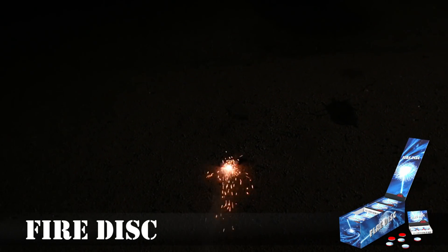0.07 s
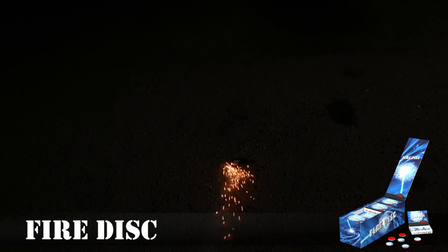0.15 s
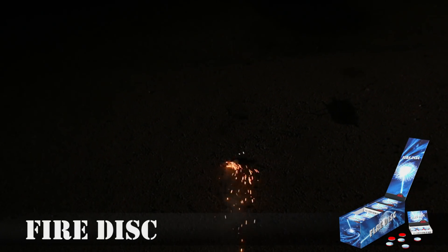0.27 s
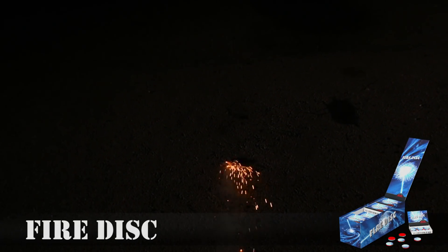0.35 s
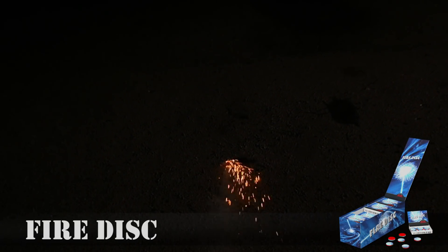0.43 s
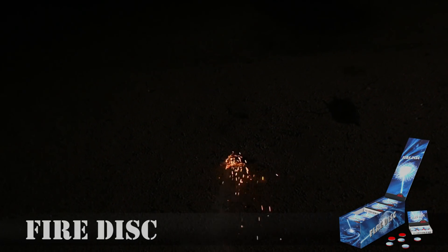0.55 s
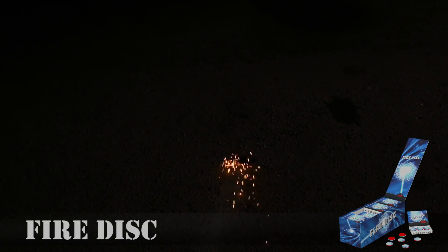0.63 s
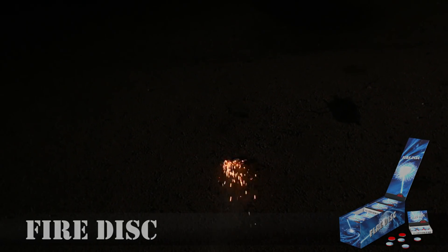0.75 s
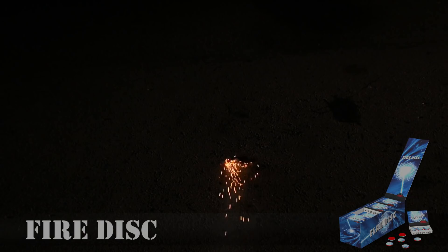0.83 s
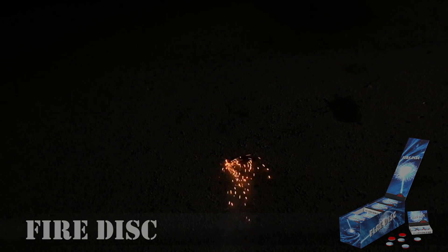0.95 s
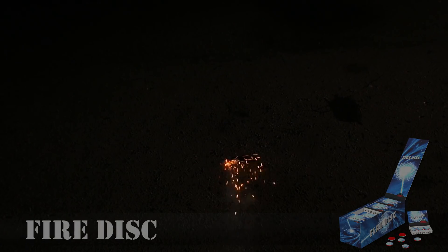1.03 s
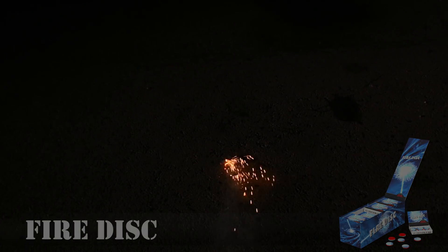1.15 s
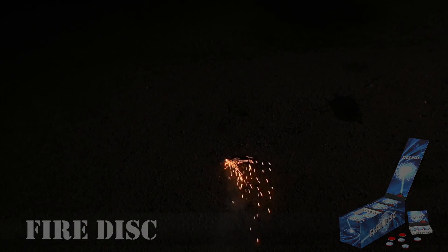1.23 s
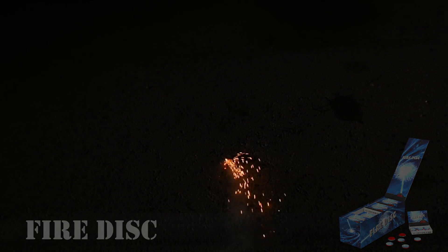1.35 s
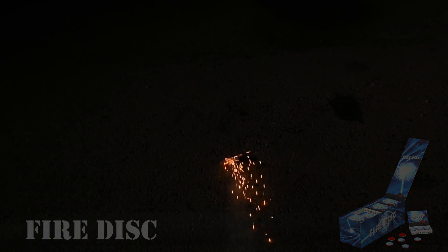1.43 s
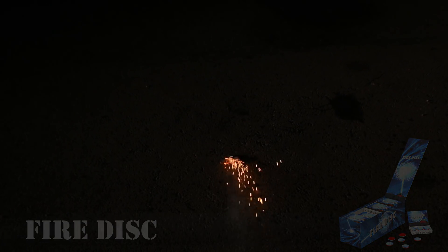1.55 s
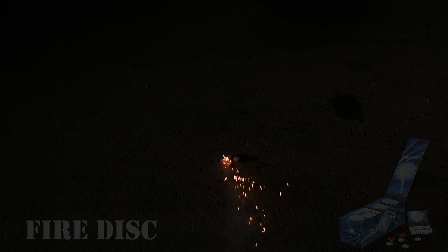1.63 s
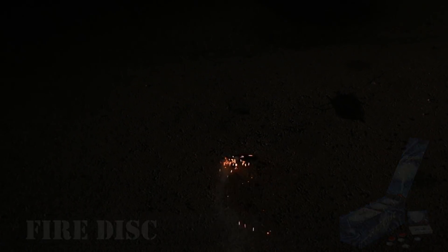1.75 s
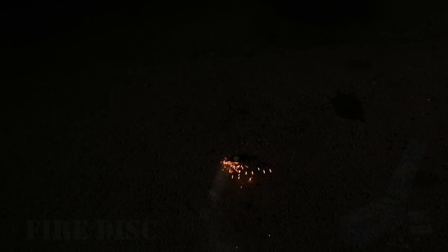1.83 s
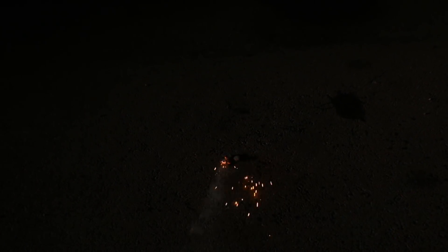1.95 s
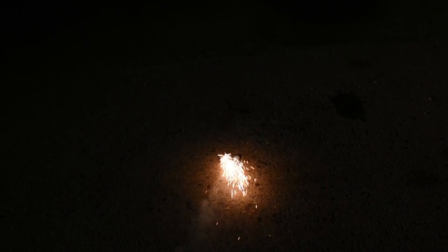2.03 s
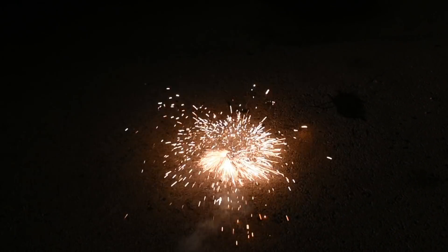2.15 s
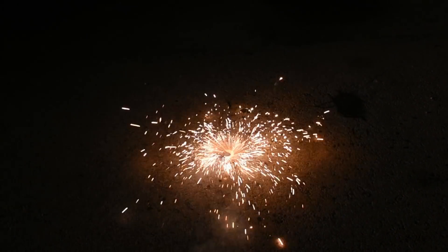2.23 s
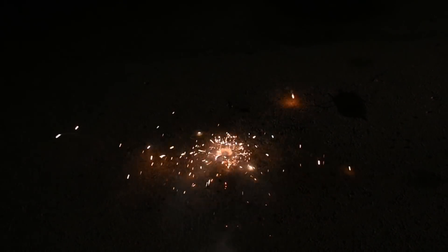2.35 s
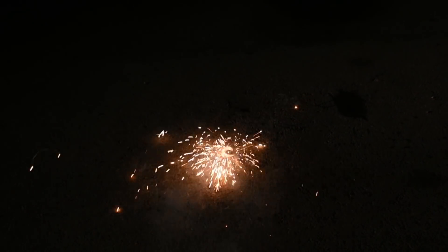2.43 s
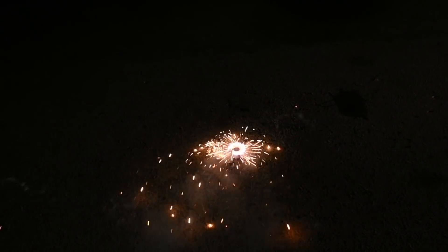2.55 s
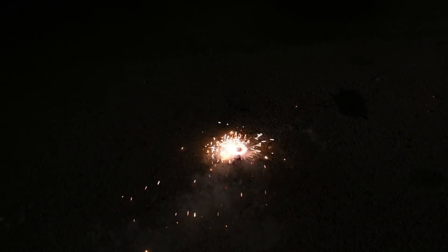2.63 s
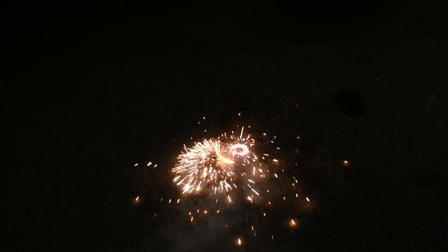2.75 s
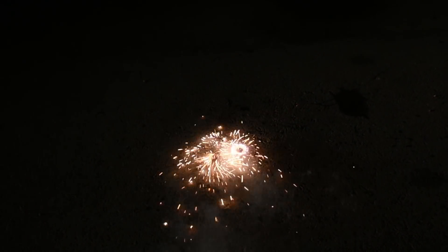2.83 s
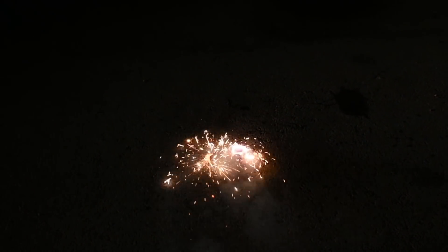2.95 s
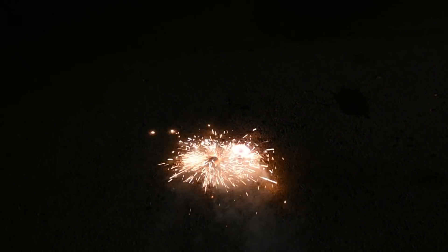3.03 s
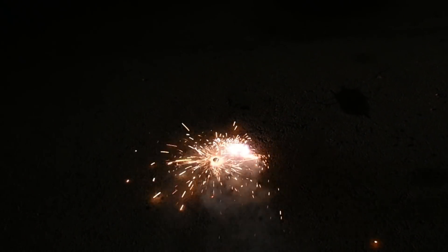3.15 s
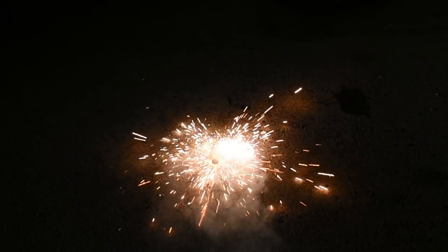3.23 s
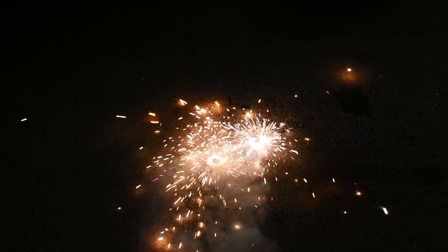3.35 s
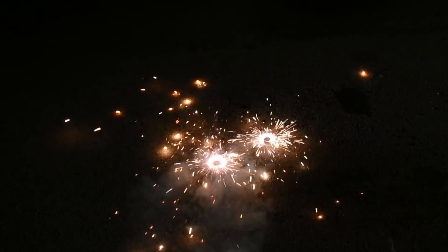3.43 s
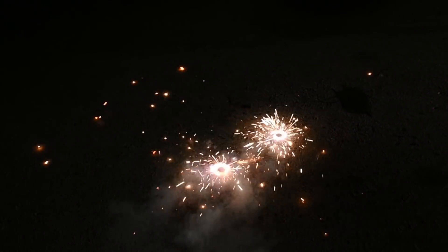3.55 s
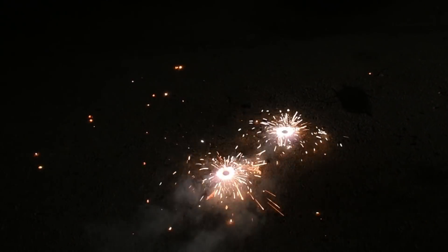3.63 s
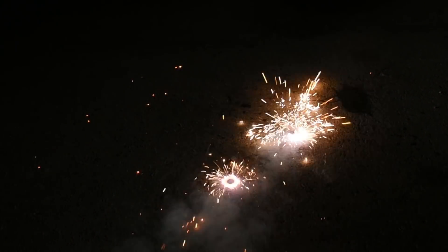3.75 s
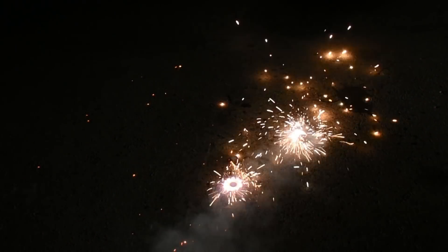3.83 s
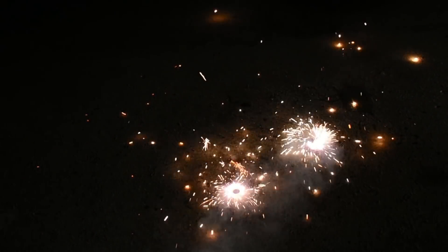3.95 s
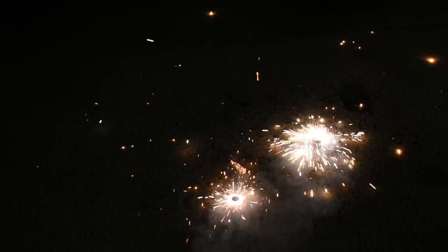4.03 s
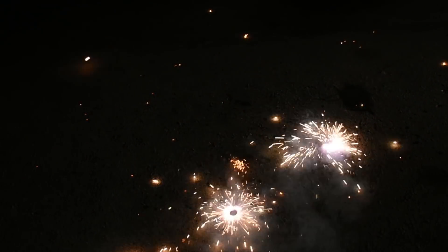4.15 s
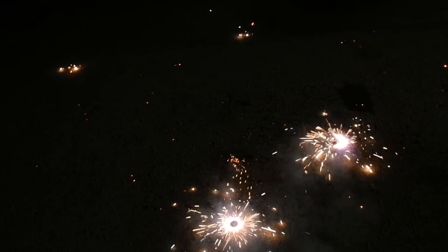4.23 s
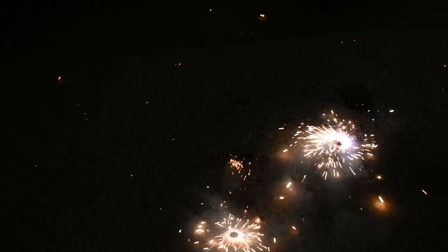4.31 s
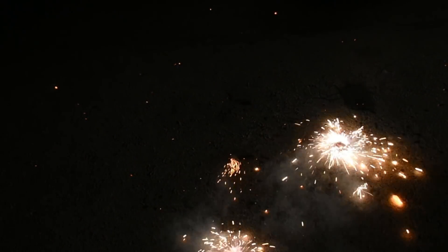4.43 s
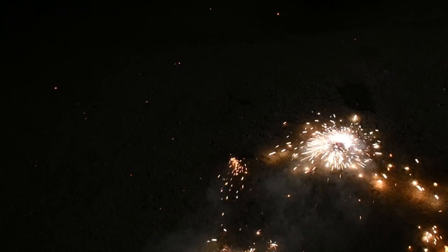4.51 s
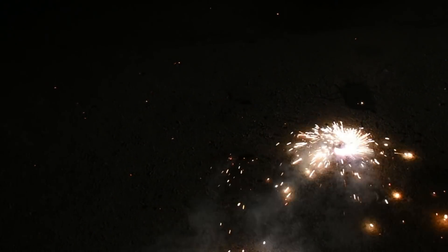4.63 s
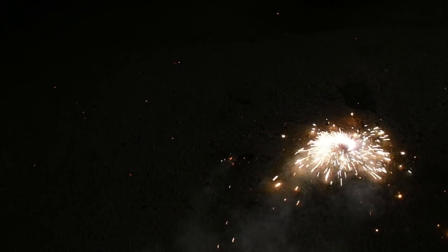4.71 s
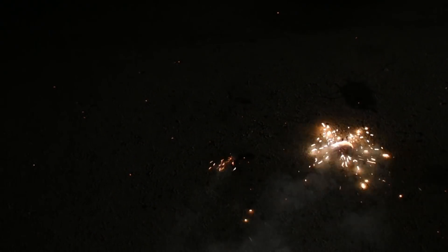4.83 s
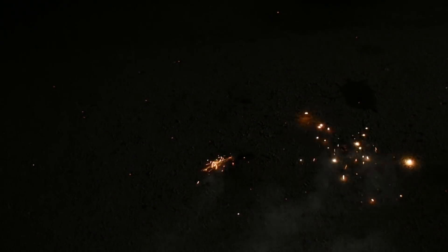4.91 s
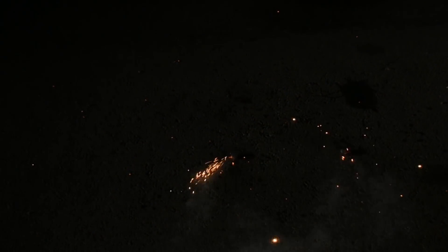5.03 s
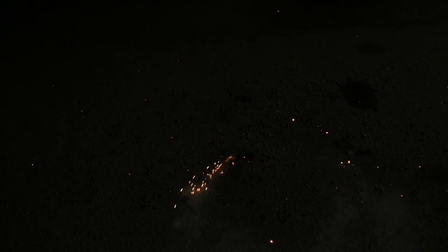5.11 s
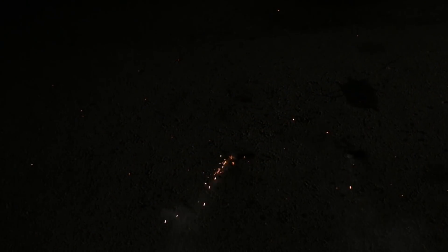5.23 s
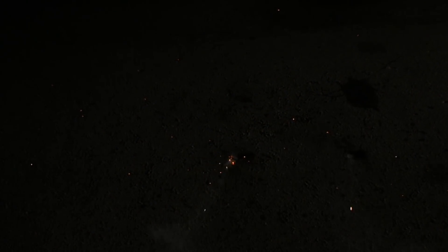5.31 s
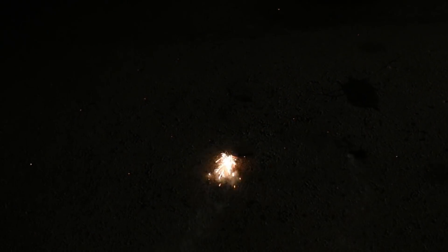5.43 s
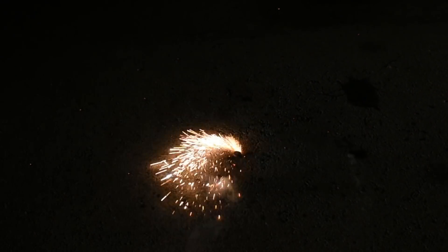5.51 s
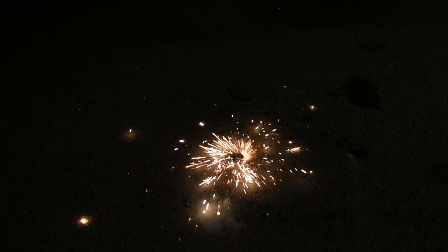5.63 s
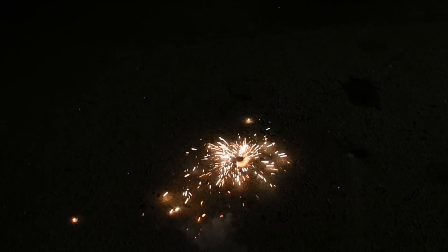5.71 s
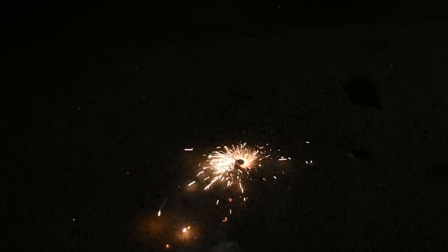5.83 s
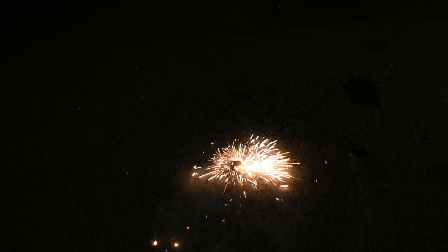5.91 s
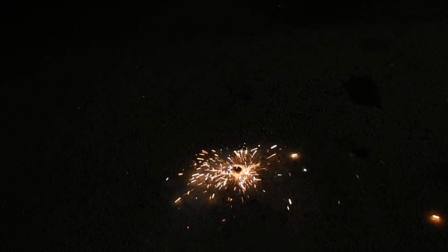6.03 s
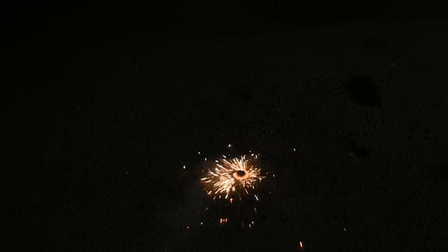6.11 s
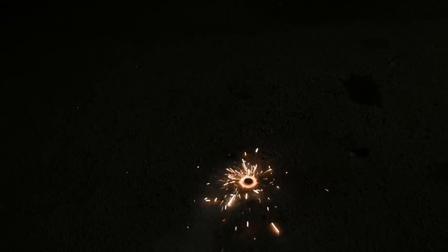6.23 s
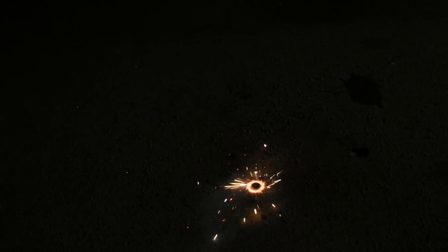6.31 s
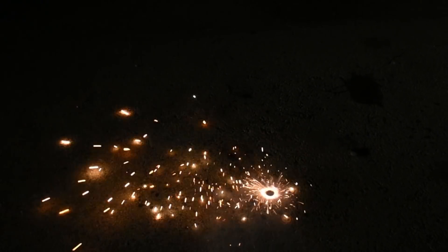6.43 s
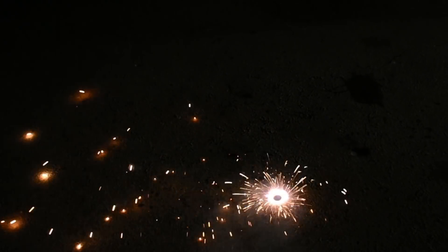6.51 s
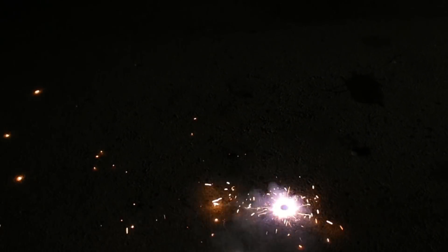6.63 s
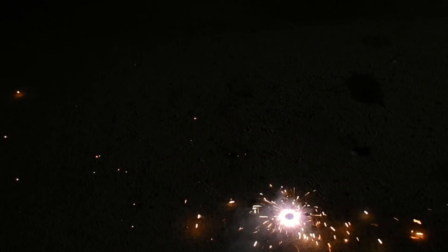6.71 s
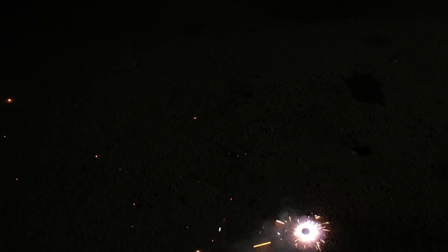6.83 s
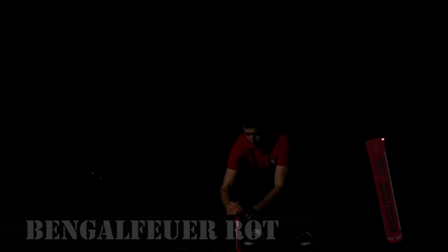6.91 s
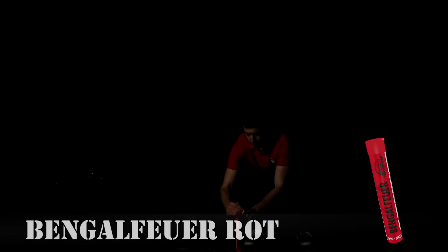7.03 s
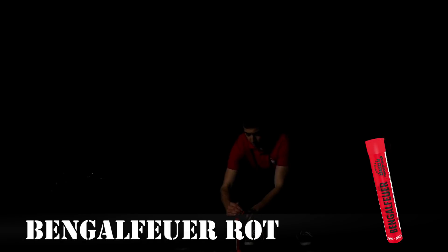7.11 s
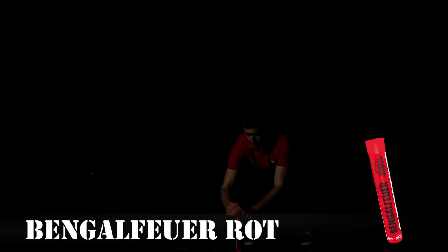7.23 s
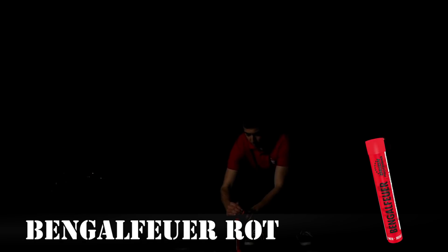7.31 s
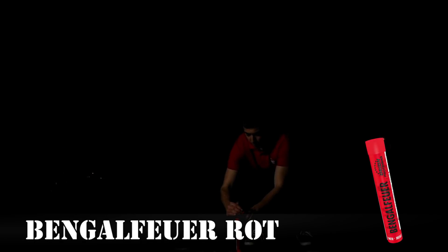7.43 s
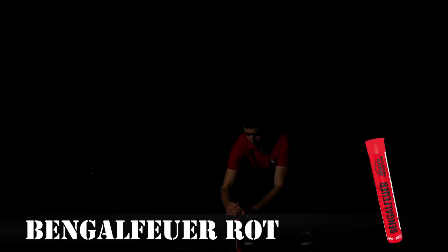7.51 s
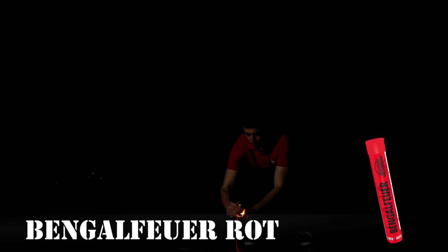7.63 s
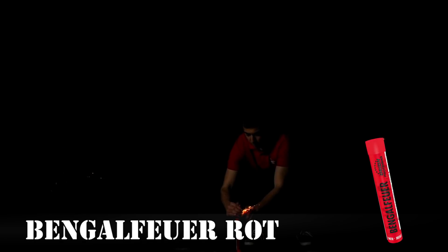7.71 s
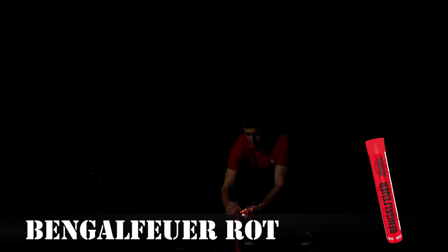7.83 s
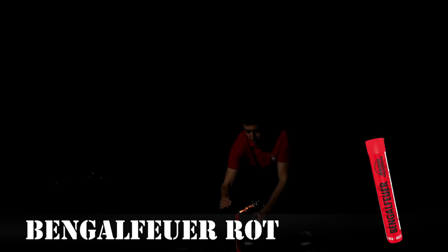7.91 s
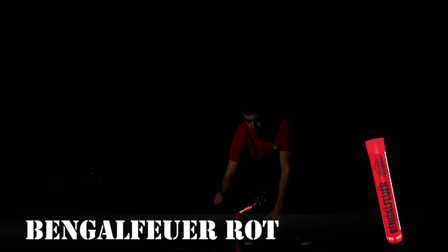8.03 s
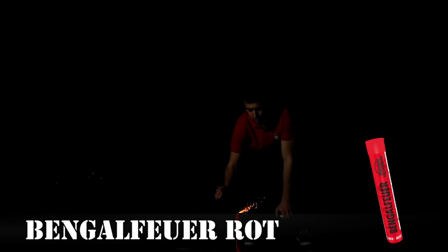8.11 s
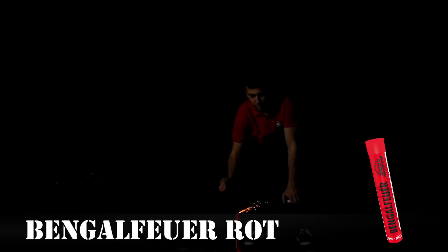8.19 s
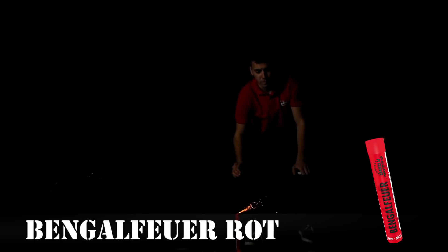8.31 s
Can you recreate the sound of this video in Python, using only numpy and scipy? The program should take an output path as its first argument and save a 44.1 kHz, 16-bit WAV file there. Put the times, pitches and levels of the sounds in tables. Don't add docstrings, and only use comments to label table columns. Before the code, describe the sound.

A faint fuse fizz snaps into a loud, fluttering firework roar with crackling sparks and ground knocks, then cuts to quiet, a lighter click and new fizz.

```python
import sys
import numpy as np
from scipy import signal
from scipy.fft import rfft, irfft, next_fast_len
from scipy.io import wavfile
from scipy.ndimage import uniform_filter1d

SR = 44100
rng = np.random.default_rng(int(sys.argv[2]) if len(sys.argv) > 2 else 0)


def invert_db(x):
    u = np.asarray(x, float) / 20
    return 10 ** u


def wrap_up_sound(samples):
    columns = np.atleast_2d(samples).T
    tamed = np.clip(columns, -1, 1)
    steps = np.round(tamed * 32767).astype(np.int16)
    wavfile.write(sys.argv[1], SR, steps)


N = 368543
T = np.arange(N) / SR
CUT_S = 6.938

# centre in Hz, curve number.
NIGHT_HZ = [(900, 0), (2500, 1), (5000, 1), (10000, 2)]


def unit(x):
    return x / np.sqrt(np.mean(x ** 2))


def curves(table):
    s, *columns = np.transpose(table)
    return [np.interp(T, s, c) for c in columns]


def on_log(hz, points):
    point_hz, value = np.transpose(points)
    return np.interp(np.log(hz), np.log(point_hz), value)


def walk(rate_hz, count=N):
    hold = int(SR / rate_hz)
    steps = np.repeat(rng.standard_normal(count // hold + 1), hold)
    return unit(uniform_filter1d(uniform_filter1d(steps, hold), hold)[:count])


def band(x, lo_hz, hi_hz):
    return signal.sosfilt(signal.butter(2, [lo_hz, min(hi_hz, .45 * SR)], "band", fs=SR, output="sos"), x)


def bell(s, half_s):
    out = np.zeros(N)
    near = slice(max(int((s - 4 * half_s) * SR), 0), int((s + 4 * half_s) * SR))
    out[near] = np.exp(-((T[near] - s) / half_s) ** 2)
    return out


def swells(floor_db, table):
    return 10 * np.log10(invert_db(2 * floor_db) + sum(invert_db(2 * db) * bell(s, half_s) for s, half_s, db in table))


def add_cycle(track, s, db, hz, turn):
    near = slice(int((s - 1.5 / hz) * SR), int((s + 1.5 / hz) * SR))
    t = (T[near] - s) * hz
    track[near] += invert_db(db) * np.exp(-(t / 0.38) ** 2) * np.cos(2 * np.pi * t + turn)


def bursts(table, low, high):
    out, t = np.zeros(N), np.arange(2000) / SR
    for s, db, ms, hz in table:
        envelope = np.sqrt(t / ms) * np.exp(-t / ms * 2700.0)
        grain = band(rng.standard_normal(2000) * envelope, hz / low, hz * high)
        i = int(s * SR)
        out[i:i + 2000] += invert_db(db) * grain / np.abs(grain).max()
    return out


def pops(table, trim_db):
    s, db = np.transpose(table)
    out = np.zeros(N)
    out[np.round(s * SR).astype(int)] = invert_db(db + trim_db)
    return band(out, 1500, 18000)


def sparks(rate_hz, size_db):
    size = invert_db(3.0 * np.minimum(rng.exponential(size=N), 2.5))
    cracks = (rng.random(N) < rate_hz / SR) * size
    return unit(rng.standard_normal(N) + invert_db(size_db) * cracks)


def colour_shifts(table, times, hz):
    s, half_s, centre_hz, db = np.transpose(table)
    half_width_octaves = 0.38
    coarse = times[::128]
    reach = db * np.exp(-(np.log2(hz / centre_hz) / half_width_octaves) ** 2)
    return np.interp(times, coarse, reach @ np.exp(-((coarse - s[:, None]) / half_s[:, None]) ** 2))


def gas(span_s, drive, colour, anchors, levels_db, main_hz, flicker_db, sweep_db=0 * T, spread_db=0 * T, shifts=None):
    # frequency in Hz, side minus mid in dB.
    port_diff = [(60, -14.5), (130, -25), (300, -21.5), (1000, -23.5), (3000, -21), (6000, -15),
                 (8500, -18.5), (12000, -12.5), (14500, -11.5), (16000, -19)]
    live = slice(int(span_s[0] * SR), int(span_s[1] * SR))
    count = len(T[live])
    size = next_fast_len(count)
    hz = np.maximum(np.arange(size // 2 + 1) * SR / size, 1)
    tint = invert_db(on_log(hz, colour))
    main = (hz > main_hz[0]) & (hz < main_hz[1])
    tint = tint / np.sqrt(2 * np.sum(tint[main] ** 2) / size)
    mid = rfft(drive[live], size) * tint
    side = rfft(rng.standard_normal(count), size) * tint * invert_db(on_log(hz, port_diff))

    main_db, *rest = [c[live] for c in levels_db]
    main_power = np.mean(invert_db(2 * main_db))
    rel = [0 * main_db]
    for c in rest:
        rel.append(c - 10 * np.log10(np.mean(invert_db(2 * (main_db + c))) / main_power))
    rel = np.array(rel)

    anchor_hz, column = np.transpose(anchors)
    out = np.zeros((2, N))
    for centre_hz in 63 * 2 ** np.arange(0, 8.1, .5):
        share = np.clip(1 - 2 * np.abs(np.log2(hz / centre_hz)), 0, 1)
        weights = [np.interp(np.log(centre_hz), np.log(anchor_hz), column == k) for k in range(len(rel))]
        beam = np.clip(np.log2(centre_hz / 900) / 4.3, .28, 1)
        db = main_db + np.dot(weights, rel) + beam * sweep_db[live] + flicker_db * walk(14, count=count)
        if shifts and centre_hz > 300:
            db = db + colour_shifts(shifts, T[live], centre_hz)
        m = irfft(mid * share, size)[:count]
        s = irfft(side * share, size)[:count] * invert_db(spread_db[live])
        out[:, live] += invert_db(db) * np.array([m + s, m - s])
    return out


def quiet_spot():
    # frequency in Hz, density in dB per Hz.
    calm_colour = [(41, -33), (70, -25), (129, -3), (152, -8), (336, -13), (695, -13.5), (1050, -12.5),
                   (1760, -22), (7910, -32), (14900, -39), (16000, -46)]
    level_db = [-58 + 0.5 * (T - CUT_S)]
    return gas((6.85, 9), rng.standard_normal(N), calm_colour, NIGHT_HZ[:1], level_db, (300, 1500), 0.55,
               spread_db=0 * T + 15.5)


def wind():
    # centre in seconds, half length in seconds, level in dB.
    gusts = [(.3, 0.056, -46), (0.507, 0.046, -40), (.74, 0.071, -43), (1.05, 0.22, -47), (1.283, .03, -40),
             (1.473, 0.068, -45), (2.4, 0.049, -44), (3.0, .4, -53.5), (3.98, .05, -60), (4.59, 0.05, -68),
             (5.05, .12, -53), (5.596, 0.04, -40), (5.765, 0.033, -39.5), (6.15, 0.48, -47),
             (6.437, 0.037, -32), (6.87, 0.037, -44), (7.633, 0.084, -46)]
    # time in seconds, peak in dB, frequency in Hz.
    puffs = [(0.288, -31, 59.2), (0.329, -26, 87.5), (0.506, -37, 76), (0.527, -35, 45.8),
             (0.739, -35, 37.7), (0.789, -22, 89), (0.833, -31, 91.5), (0.874, -34, 83.4),
             (0.949, -35, 37.7), (1.279, -29, 37.7), (1.409, -36, 51.1), (1.488, -36, 64.6),
             (3.306, -18, 89.6), (6.42, -29, 56.5), (7.53, -46.5, 110), (7.595, -43, 75), (7.68, -47, 95),
             (7.74, -48, 120)]
    breeze_db, shelter_db, port_diff_db = -54.5, -5, -7.5
    rumble = np.array([unit(band(rng.standard_normal(N), 27, top_hz)) for top_hz in (60, 90)])
    level_db = swells(breeze_db + shelter_db * (T > CUT_S), gusts) + 3.6 * walk(19)
    mid, side = rumble * invert_db(level_db)
    for s, db, hz in puffs:
        add_cycle(mid, s + 0.033 / hz, db, hz, .6)
        add_cycle(side, s, db - 4.0, hz * 1.5, -.6)
    return mid + invert_db(port_diff_db) * side * np.array([[1], [-1]])


def lighter():
    # frequency in Hz, level in dB, t60 in seconds.
    modes = [(6400, 2.5, 0.0072), (5840, -1, 0.0096), (9300, 2.5, 0.0056), (10900, -12, .008),
             (15000, -1, 0.009), (3200, -4.5, 0.012)]
    start_s, click_db, echo_db, echo_t60_s = 6.8836, -21, -39.0, 0.28
    t, out = T[:SR // 2], np.zeros((2, N))
    click, tail = 0, np.zeros((2, len(t)))
    for hz, db, t60_s in modes:
        click = click + invert_db(db - 60 * t / t60_s) * np.sin(2 * np.pi * hz * t)
        for port in tail:
            noise = band(rng.standard_normal(len(t)), hz * 0.86, hz * 1.14)
            port += invert_db(db - .5 * hz / 1e3) * unit(band(noise, hz * 0.82, hz * 1.12))
    tail = tail + 0.53 * np.sum(tail, axis=0)
    echo = invert_db(echo_db - 60 * t / echo_t60_s) * tail
    out[:, int(start_s * SR):][:, :len(t)] = invert_db(click_db) * click + echo
    return out


def second_fuse():
    # time in seconds, burn in dB, brightness in dB.
    burn = [
        (7.72, -71, -9),
        (7.746, -67, -10),
        (7.756, -52.5, -8),
        (7.85, -48, -10),
        (7.94, -52.5, -5.5),
        (7.98, -50, -2),
        (8.03, -53, 1.5),
        (8.135, -49, 3),
        (8.34, -52, 0),
    ]
    # frequency in Hz, density in dB per Hz.
    fizz_colour = [(290, -7.5), (500, -4.5), (686, -6.5), (737, -3), (901, -3.5), (1060, -8), (1390, -4.5),
                   (1490, -9.5), (1620, -7), (1990, -9), (2160, -12.5), (4020, -9), (7890, -18),
                   (10100, -16), (15500, -20)]
    # centre in Hz, number of the level curve that rules there.
    fizz_anchors = [(900, 0), (1600, 1), (2400, 1), (3300, 2), (4300, 2), (5800, 3), (8500, 3)]
    # time in seconds, half length in seconds, centre in Hz, gain in dB.
    late_flares = [
        (7.8, .04, 3000, -1),
        (7.85, .08, 6000, 2),
        (7.9, .06, 1700, 2),
        (8.1, .08, 7000, 4),
        (8.15, .08, 3500, 1),
        (8.28, .05, 10000, 0),
    ]
    burn_db, bright_db = curves(burn)
    lick_db = 4.6 * bell(7.9, 0.055)
    levels_db = [burn_db, lick_db, bright_db, 0.52 * bright_db]
    return gas((7.72, 9), sparks(100, 3.7), fizz_colour, fizz_anchors, levels_db, (400, 1400), 1.0,
               spread_db=0 * T + 8.0, shifts=late_flares)


def first_fuse():
    # frequency in Hz, density in dB per Hz.
    night_colour = [(41, -37), (70, -0.5), (182, -4.5), (250, -16.5), (286, -7.5), (472, -14.5),
                    (1070, -13), (1250, -13.5), (2600, -19), (5370, -28.5), (13600, -33.5), (16000, -38)]
    # time in seconds, half length in seconds, centre in Hz, gain in dB.
    early_flares = [
        (.62, .05, 8000, -2.5),
        (.95, .12, 9000, 3),
        (1.1, 0.3, 2800, 2),
        (1.28, .05, 3500, -2),
        (1.6, .08, 8500, 1.5),
        (1.65, .04, 2500, 4),
        (1.74, .018, 12000, 6),
        (1.83, .06, 12000, -5),
        (1.9, .04, 3000, 2.5),
    ]
    # time in seconds, peak in dB.
    grain_pops = [(0.2132, -38.2), (0.2901, -39.8), (0.3063, -41.3), (0.3544, -41.0), (0.3687, -36),
                  (0.4042, -40.1), (0.4526, -35.7), (0.4693, -27.8), (0.5108, -38.9), (0.5664, -41.0),
                  (0.628, -38.1), (0.6513, -42.0), (0.7791, -40), (0.8057, -39.9), (0.8406, -38),
                  (0.8489, -39.0), (0.8865, -40.5), (0.9063, -39.2), (0.9818, -38.4), (0.9964, -38.3),
                  (1.01, -41.3), (1.0926, -40.3), (1.1163, -32), (1.1423, -40.9), (1.2516, -41.2),
                  (1.3632, -40), (1.4838, -38), (1.5578, -41.7), (1.5767, -37), (1.5871, -40.0),
                  (1.608, -42.2), (1.6452, -41.0), (1.66, -42), (1.6654, -33), (1.6883, -34.6),
                  (1.7017, -43), (1.7376, -33.4), (1.7411, -34.2), (1.7464, -25), (1.7639, -41.1),
                  (1.8018, -43.5), (1.8058, -44.2), (1.8362, -44.6), (1.8576, -38.3), (1.8632, -42.9),
                  (1.891, -34), (1.9375, -40.9), (2.032, -37.9), (2.0398, -40.7), (2.0676, -43.8)]
    night_db = -48.5 - 0.8 * T
    fizz_db = -2 * T + 2.2 * bell(1, .6) + 4.2 * bell(0.49, .05)
    top_db = 2 * np.minimum(T, 1.6) + 2.8 * bell(.48, 0.041)
    fizz = gas((0, 2.3), sparks(150, 9), night_colour, NIGHT_HZ, [night_db, fizz_db, top_db], (300, 1500), 1.0,
               spread_db=0 * T + 9.0, shifts=early_flares)
    return fizz + pops(grain_pops, 4)


def stone_knocks():
    # time in seconds, peak in dB, length in ms, centre in Hz.
    knock_list = [(.2125, -32, 1.1, 4500), (.3684, -30, 0.87, 1300), (.3686, -35, .7, 3800),
                  (.4065, -28, 2.4, 900), (.409, -27.5, 3.7, 448), (.452, -35, 3, 3500),
                  (.4685, -34, 2.2, 8000), (.511, -35, 1.1, 2000), (1.737, -43, 4.8, 8000),
                  (1.744, -39, 6, 3500), (1.735, -39, 9, 14000), (1.515, -32.5, 2.2, 2500),
                  (1.978, -37, 4.3, 2200), (2.09, -41, 2.4, 2500), (2.302, -11, 2.3, 1290),
                  (5.449, -6.5, 1.3, 2020), (6.015, -27, 1, 1490), (6.016, -19, 5, 300),
                  (6.08, -24, 5, 300), (6.12, -25, 3, 397), (6.449, -23, 5.3, 220)]
    return bursts(knock_list, 2.8, 1.2) * np.array([[1.06], [.94]])


def gas_spits():
    # time in seconds, peak in dB, length in ms, centre in Hz.
    spit_list = [
        (2.176, -12.5, 3, 7000),
        (2.7455, -14.5, 3.07, 7020),
        (3.2965, -6, 8, 8000),
        (3.3042, -3, .8, 7000),
        (3.3065, -3.5, 6, 7100),
        (3.3135, -2, 5, 8000),
        (3.3149, -1, .5, 5000),
        (6.0154, -9, 2.3, 7000),
        (6.8832, -19, 1.5, 9000),
    ]
    return bursts(spit_list, 5, 2.6)


def jet_pops():
    # time in seconds, peak in dB.
    large_grains = [(2.3205, -7.2), (2.4517, -23), (2.4619, -21.0), (2.6331, -5), (2.6432, -13.4),
                    (2.7467, -8), (2.8667, -13.8), (3.1708, -12.9), (3.1982, -11.1), (3.6519, -16.0),
                    (3.6648, -21), (3.7261, -18.8), (3.7913, -18.0), (3.8112, -17.6), (3.8619, -14.4),
                    (3.8706, -9), (4.0131, -12.4), (4.7494, -12.3), (4.7828, -11.0), (4.9753, -13.0),
                    (4.9975, -12.6), (5.0699, -15), (5.2451, -14.5), (6.1997, -11.7), (6.8157, -20),
                    (6.8386, -23.8)]
    return pops(large_grains, 2)


def skip(count=9):
    start_s, first_gap_s, last_gap_s = 2.3405, .0130, .0119
    peak_db, thud_hz = -17.5, 320
    out = np.zeros(N)
    gaps_s = np.r_[0, np.linspace(first_gap_s, last_gap_s, count - 1)]
    for k, s in enumerate(start_s + np.cumsum(gaps_s)):
        add_cycle(out, s, peak_db - 4.5 * (k / 3.9 - 1.0) ** 2, thud_hz, -.7)
    return out


def discs():
    # time in seconds, turns per second.
    spins = [
        [(2.1, 9.8), (2.25, 33), (2.34, 63), (2.46, 85), (2.56, 78), (2.8, 97), (3.25, 103), (3.7, 108)],
        [(2.72, 20.6), (3.05, 44), (3.35, 127), (3.45, 152), (3.57, 160), (3.9, 155), (4.12, 160)],
        [(4.02, 32.6), (4.4, 38.7), (4.52, 42), (4.87, 24.5)],
        [(4.35, 72), (4.55, 97), (4.75, 79), (4.95, 100), (5.42, 87)],
        [(5.52, 8.86), (5.95, 48.3), (6.15, 111), (6.5, 117), (6.65, 135), (6.77, 123), (6.93, 180)],
    ]
    depths_db = [2.4, 3.1, 2.7, 2.4, 2.7]
    # time in seconds, half length in seconds, knock in dB.
    rattles = [
        [(2.95, 0.48, -50), (3.28, 0.029, -36)],
        [(3.35, 0.054, -40), (3.58, 0.05, -38.5), (3.82, 0.21, -44), (4.05, 0.026, -38)],
        [],
        [],
        [(5.95, .08, -60), (6.55, 0.087, -49), (6.77, 0.06, -40.5)],
    ]
    idle_db = -56.5
    sweep_db, knocks, wobble = 0, 0, 1 + 0.0047 * walk(40)
    for spin, depth_db, leans in zip(spins, depths_db, rattles):
        turns_hz, rim_db = curves(spin)[0], swells(idle_db, leans)
        alive = (T > spin[0][0]) & (T < spin[-1][0])
        phase = np.cumsum(turns_hz * wobble) / SR
        angle = 2 * np.pi * phase
        beam = np.cos(angle) + 0.33 * np.cos(2 * angle) + 0.27 * np.sin(2 * angle)
        sweep_db = sweep_db + alive * depth_db * beam
        hits = np.diff(np.floor(phase), prepend=0) * alive
        knocks = knocks + hits * invert_db(rim_db + 2.9 * walk(30)) * np.sqrt(SR / turns_hz)
    return sweep_db, invert_db(26.0) * band(knocks, 125, 225.4) + invert_db(22.0) * band(knocks, 275, 360)


def burning():
    # time in seconds, thrust in dB, nozzle aim at the camera in dB, ground scraping in dB.
    burn = [(2.07, -53, -6.5, -1), (2.14, -27, -9.5, -11.5), (2.24, -22, -3, -12), (2.38, -25, -3, -11.5),
            (2.46, -30, -10, -15.5), (2.6, -23.5, -6, -11.5), (3.05, -29.5, -2, -7.5),
            (3.37, -24.5, 2, -5.5), (3.44, -25.5, -10, -5), (3.9, -28.5, -4, -5), (4.76, -27.5, -4.5, -3),
            (5.06, -21, -9.5, -10), (5.56, -27.5, -7.5, -10.5), (5.63, -25.5, -0.5, -12.5),
            (6.33, -27, 1, -15), (6.65, -24.5, -2.5, -6.5), (6.71, -34.5, -3.5, 2.5),
            (6.93, -36.5, -8.5, -1)]
    # time in seconds, side share in dB, loss of the top in dB,
    # pavement echo notch in dB.
    wander = [(2.1, -2.2, -1, 0.5), (2.4, -0.7, 6, -1.7), (3.05, -0.9, 3, -2), (3.5, -0.65, -1, -5),
              (3.9, 0, 5.5, 3.5), (4.4, 1.4, 2.7, -0.5), (4.8, 1.5, 1, 2.5), (5.02, 3.5, 6, -1.5),
              (5.42, 5, 10, -5), (5.55, 3.5, 2.5, -8), (5.62, -1.1, 3, -2), (6.6, 0.5, 0.3, 0.5),
              (6.75, 1, 4, 0.5)]
    # time in seconds, half length in seconds,
    # thrust change in dB, aim change in dB.
    surges = [(2.167, 0.038, -3, 8), (2.214, 0.014, 3.5, -1.5), (2.326, 0.055, 0.4, 3.5),
              (2.522, 0.035, 0, 4), (2.725, 0.073, -2, -5), (2.81, 0.051, 2.2, 4), (3.361, 0.051, -6.5, 1),
              (3.2, 0.061, -2.5, 0), (3.304, 0.04, 4.5, -4), (3.495, 0.033, 1, 3),
              (3.644, 0.043, -1.5, 0.5), (3.797, 0.083, 0.5, -6), (3.832, 0.012, -2.5, 1.5),
              (3.967, 0.04, 0, 3), (4.053, 0.025, -3, 3), (4.2, 0.16, 3.5, 0.5), (4.387, 0.12, 1.5, -1),
              (4.665, 0.037, 0.1, 1.5), (5.026, 0.025, 0, 2), (4.926, 0.042, -1.5, 0.5),
              (5.37, 0.023, -2, -3.5), (5.44, 0.019, 5, -3.5), (5.589, 0.027, 2, 2), (5.73, 0.053, 3, -3),
              (5.818, 0.073, -1, -2.5), (6.032, 0.077, 3, -1), (6.073, 0.018, -4, 4.5),
              (6.103, 0.044, 3.5, -2.5), (6.47, 0.031, 1, -5.5), (6.787, 0.023, 2.5, 1)]
    # time in seconds, half length in seconds, rumble gain in dB.
    grinds = [
        (2.168, .03, 5),
        (3.43, 0.026, 3),
        (3.827, 0.026, 4.5),
        (4.047, 0.028, 3.5),
        (5.554, 0.082, 11),
        (6.072, 0.029, 5),
        (6.443, 0.017, 2.5),
    ]
    thrust, aim, scrape = curves(burn)
    spread_db, loss, notch = curves(wander)
    flare = sum(db * bell(s, half_s) for s, half_s, db, _ in surges)
    body = -0.3 * aim
    aim = aim + sum(db * bell(s, half_s) for s, half_s, _, db in surges)
    scrape = scrape + sum(db * bell(s, half_s) for s, half_s, db in grinds)
    rumble = scrape - 0.31 * flare
    sizzle = 1.37 * aim - loss
    body = body + 0.55 * scrape
    edge = 0.89 * aim - notch
    return [thrust + flare, rumble, aim, sizzle, body, edge], spread_db


def jets():
    # frequency in Hz, density in dB per Hz.
    jet_colour = [(35, -36), (60, -5.5), (156, -2.5), (262, -6), (398, -0.5), (715, -3), (822, -0.5),
                  (1140, -1.5), (1750, 0.5), (2200, 1), (2900, -1), (4120, -3.5), (4970, -6.5), (13600, -8),
                  (16000, -12)]
    # centre in Hz, number of the level curve that rules there.
    jet_anchors = [(500, 1), (1100, 4), (2400, 0), (3000, 0), (4300, 5), (5800, 2), (7500, 2), (12000, 3)]
    # time in seconds, half length in seconds,
    # centre in Hz, gain in dB.
    whooshes = [(2.193, 0.06, 12000, -2), (2.214, .03, 1890, 3), (2.58, .04, 15000, 4),
                (2.6, 0.05, 2000, 4), (2.7, 0.036, 5500, -1), (2.93, 0.029, 15000, 3.5),
                (3.112, 0.099, 11400, -6), (3.17, .06, 6000, -0.5), (3.035, .012, 9000, -13),
                (3.38, 0.043, 15000, -8), (3.41, .04, 2200, 1.5), (3.47, 0.054, 1400, 2),
                (3.52, 0.046, 11400, -4.5), (3.514, 0.034, 2800, 4.5), (3.537, 0.044, 990, -5.5),
                (3.702, .05, 1980, 1.5), (3.856, 0.02, 15000, 17), (3.977, 0.093, 1300, 4),
                (4.13, 0.13, 900, 5), (4.361, 0.039, 11400, -3), (4.563, 0.11, 8000, 3),
                (4.63, 0.051, 1010, -1), (4.66, 0.11, 4200, 1.5), (4.774, 0.032, 4500, -5),
                (4.76, 0.046, 900, 5.5), (4.837, 0.027, 3500, -3), (4.91, 0.026, 5000, -6),
                (4.95, .012, 2500, -5), (4.982, 0.028, 2800, 3.5), (5.045, .06, 11400, -3.5),
                (5.048, 0.042, 3000, 2.5), (5.13, .05, 2000, -2), (5.187, 0.056, 885, 5.5),
                (5.3, 0.042, 2480, -3), (5.36, 0.067, 550, 1), (5.39, 0.11, 15000, -4),
                (5.61, .06, 3000, 1.5), (5.73, 0.022, 2800, 2), (5.794, .06, 11400, -3),
                (5.9, .12, 2000, -1.5), (6.098, 0.027, 3000, 1), (6.194, 0.034, 14000, -11),
                (6.35, .05, 13000, -9), (6.418, .03, 3000, 0.5), (6.475, 0.019, 1500, 4),
                (6.53, .025, 10000, -10), (6.567, .025, 4200, 4), (6.642, 0.037, 1800, 2),
                (6.675, 0.024, 500, -6), (6.735, .06, 15000, 6), (6.779, .05, 2600, 4.5)]
    sweep_db, knocks = discs()
    levels_db, spread_db = burning()
    sputter_db = 1.0 * walk(24.854) + 0.93 * walk(90) + 1.0 * walk(300)
    roar = gas((2.085, CUT_S), sparks(500, 4.4), jet_colour, jet_anchors, levels_db, (1200, 3600), 1.27,
               sweep_db + sputter_db, spread_db, whooshes)
    return roar + knocks


def scene():
    first = first_fuse() + stone_knocks() + gas_spits() + jet_pops() + skip() + jets()
    return (T < CUT_S) * first + quiet_spot() + second_fuse() + wind() + lighter()


def drop_weak_sides(mid, side):
    spectra = signal.stft(np.array([mid, side]), nperseg=2048, noverlap=1024)[2]
    edges = np.r_[0:40:4, 40:200:16, 200:1025:32]
    power = np.add.reduceat(np.abs(spectra) ** 2, edges, axis=1)
    power = np.repeat(power, np.diff(edges, append=1025), axis=1)
    kept = spectra[1] * (power[1] > power[0] * invert_db(2 * -14.))
    return signal.istft(kept, nperseg=2048, noverlap=1024)[1][:N]


def band_limit(x):
    return signal.sosfilt(signal.butter(12, 17020, fs=SR, output="sos"), x)


def record(dry):
    top_cut = signal.ellip(10, .2, 80, 15880, fs=SR, output="sos")
    left, right = signal.sosfilt(top_cut, np.clip(dry, -.9, .9))
    mid, side = (left + right) / 2, (left - right) / 2
    side = drop_weak_sides(mid, side)
    return band_limit(np.array([mid + side, mid - side]))


dry = scene()
out = record(dry)
wrap_up_sound(out)
```